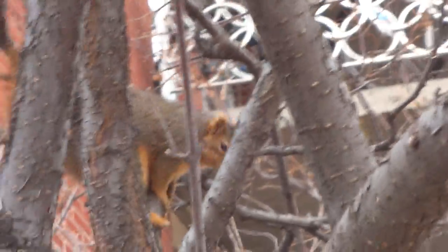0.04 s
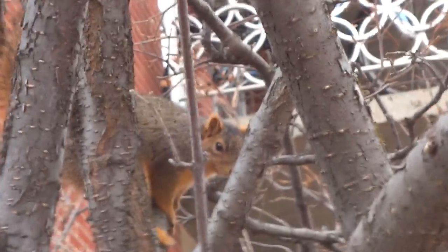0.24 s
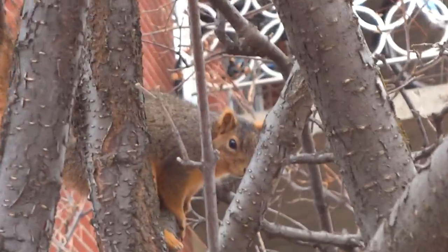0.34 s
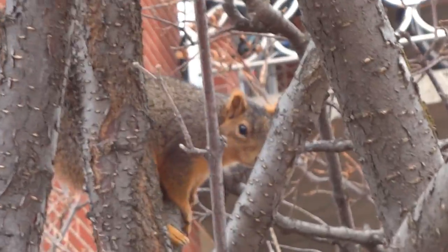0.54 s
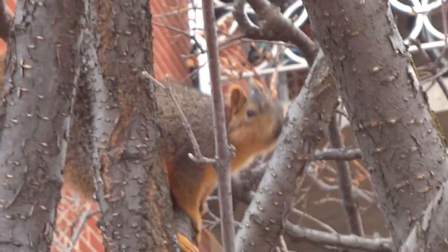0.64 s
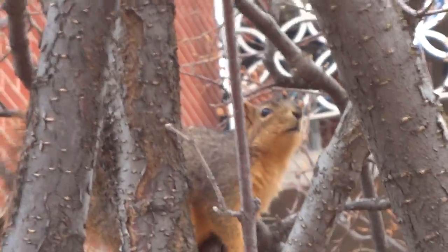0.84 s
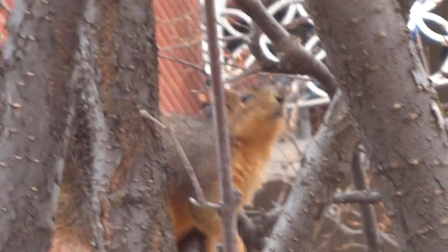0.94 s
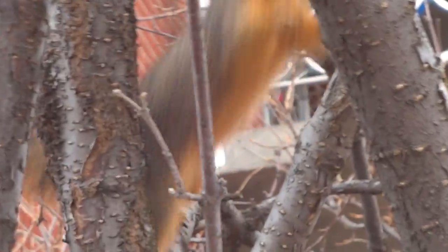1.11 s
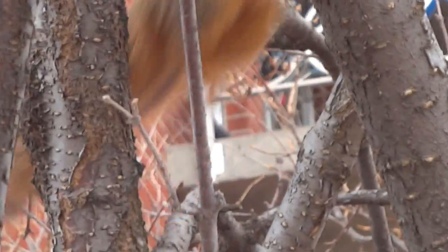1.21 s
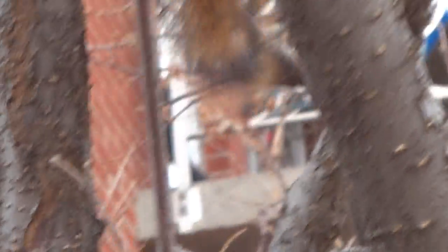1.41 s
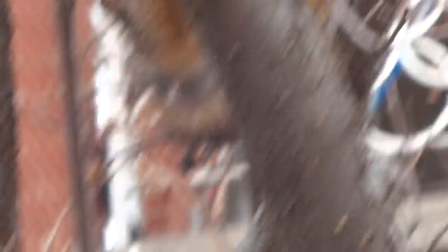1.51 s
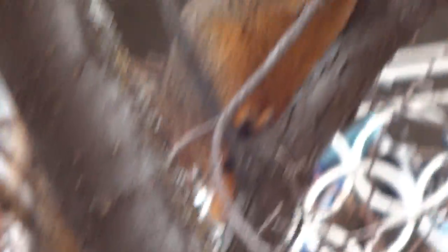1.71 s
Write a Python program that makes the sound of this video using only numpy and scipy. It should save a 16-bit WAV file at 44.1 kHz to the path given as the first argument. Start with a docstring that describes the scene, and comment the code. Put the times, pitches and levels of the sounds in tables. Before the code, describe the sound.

A small plastic catch snaps twice and rubs softly back, against a distant town hum.

```python
"""Quiet outdoor air and a far town hum run throughout. Close by, a little to the right, something small
and hard, probably a plastic button or catch, slides with a faint hiss and at 0.16 s snaps in a double
click that rings its shell. At 0.43 s it rubs back with a short scratchy creak. It slides and snaps
again at 0.78 s, and rubs back once more at about 1.44 s."""
import sys
import numpy as np
from scipy import signal
from scipy.fft import rfft, irfft
from scipy.io import wavfile
from scipy.ndimage import uniform_filter1d

SR = 44100
rng = np.random.default_rng(int(sys.argv[2]) if len(sys.argv) > 2 else 0)


def unload_wav(signal):
    """Save mono or channel-first audio to the path in sys.argv[1] as 16-bit WAV at rate SR, clipped to [-1, 1]."""
    wavfile.write(
        sys.argv[1],
        SR,
        np.round(np.clip(np.atleast_2d(signal).T, -1, 1) * 32767).astype(np.int16),
    )


N = 77175  # 1.75 seconds


def snaps():
    """The catch lets go, then lands an instant later: two dry cracks that leave the shell ringing."""
    # Each row: landing time in seconds, then in relative dB the landing's level, its boost,
    # the shell's highest tone, the first crack's level and its boost.
    double_clicks = [(0.1589, -1.5, -2, -15, -6.5, 5), (0.7825, -2, -0.5, -4, -16, 4)]
    # The tone of a crack. Each row: frequency in Hz, relative level in dB.
    tone = [(60, -22), (200, -12.5), (400, -8.5), (900, -3), (1200, -19), (1500, -3), (1850, -13),
            (2150, 4), (2550, 7), (3200, -1.5), (4200, -0.5), (5200, -2), (6800, -7.5), (9000, -14.5),
            (12000, -15.5), (16000, -37)]
    # Each row: frequency in Hz, left minus right in dB.
    balance = [(200, -1), (700, -1.5), (1400, -18), (2400, -5.5), (4200, -15.5), (6500, 5), (9000, 5),
               (15000, -5)]
    boost_share = read([(4800, 0.43), (7500, 0.58)])  # about half a boost applies, more in the treble
    gap_s, crack_db, release_ring_db = 0.00168, -4.5, -29
    out = np.zeros((2, N))
    for at, db, boost_db, top_db, release_db, release_boost_db in double_clicks:
        release, landing = -tap(at - gap_s, release_db), tap(at, db)  # they push opposite ways
        for push, extra_db in ((release, release_boost_db), (landing, boost_db)):
            out += undb(crack_db) * stereo(push, read(tone) + extra_db * boost_share, balance)
        ring = signal.fftconvolve(landing + undb(release_ring_db) * release, shell_ring(top_db))[:N]
        out += ring * undb([[-2], [2]])  # louder on the right
    return out


def shell_ring(top_db):
    """The struck shell rings with a few fading tones; top_db sets how strongly the highest one wakes."""
    # Each row: pitch in Hz, relative level in dB, seconds to fade by 60 dB.
    shell_tones = [(588.5, -44.5, 0.061), (1540, -76, 0.06), (2778, -38.5, 0.054), (3920, -42.5, 0.034),
                   (4460, -42.5, 0.067)]
    t = np.arange(N) / SR
    tones = [undb(db) * np.sin(2 * np.pi * hz * t) * undb(-60 * t / fade) for hz, db, fade in shell_tones]
    ring = sum(tones[:-1]) + undb(top_db) * tones[-1]
    low_cut = signal.butter(2, 418, "high", fs=SR, output="sos")  # the ring stays out of the low range
    return signal.sosfilt(low_cut, ring)


def slides():
    """Fine friction makes a hiss that grows until each snap; the first slide snags with bright ticks."""
    # Each row: peak time in seconds, rise in seconds, relative level in dB.
    hisses = [(0.152, 0.013, -42), (.779, 0.017, -47.5)]
    # Each row: time of a snag in seconds, relative level in dB.
    snags = [(0.1308, -32), (0.1472, -22)]
    # The tone of the hiss. Each row: frequency in Hz, relative level in dB.
    tone = [(590, -36), (1000, -10), (1940, -11), (2620, 6), (3380, 0), (4310, 6), (5970, -1.5),
            (8650, 2.5), (9600, -7), (11400, 6), (16000, -17)]
    # Each row: frequency in Hz, left minus right in dB.
    balance = [(1000, -11), (3000, -13.5), (6000, -1.5), (14000, 6)]
    loudness = sum(undb(db) * swell(at, rise, fall=0.0037) for at, rise, db in hisses)
    hiss = loudness * slips(per_second=14000, unevenness=0.2)
    ticks = sum(tap(at, db) for at, db in snags)
    return stereo(hiss + ticks, read(tone), balance)


def rubs():
    """The part catches and slips in quick spurts on its way back, and ticks as it lets go and stops."""
    # Each row: peak time, rise and fall in seconds, then relative level, body and treble boosts in dB.
    spurts = [(0.4251, 0.007, 0.00091, -45, -6, -2), (0.4272, 0.0015, 0.00069, -51, -2, 8),
              (.4320, 0.0021, 0.0007, -33.5, 15, 4), (1.4338, 0.0066, 0.0012, -45.5, -22, 3),
              (1.4373, 0.002, 0.001, -34.5, 10, -2), (1.4398, 0.0015, 0.0033, -35.5, -18, 2.5),
              (1.4517, .004, 0.00081, -44, -24, 4), (1.4563, 0.0018, 0.0048, -41.5, -17, -4)]
    # Each row: time of a dull tick in seconds, relative level in dB.
    dull_ticks = [(0.4147, -32), (1.4203, -26), (1.4581, -20)]
    # The tone of the creak. Each row: frequency in Hz, relative level in dB.
    tone = [(290, -53), (500, -37), (1090, -14), (1510, 4.5), (1840, -11.5), (1950, -10.5), (2810, 4.5),
            (3340, -0.5), (3700, -1.5), (4150, -11), (4730, -14.5), (7980, -14), (10700, -31.5),
            (13800, -28), (16000, -45)]
    # Each row: frequency in Hz, left minus right in dB.
    balance = [(60, -1.5), (110, -4), (200, -7), (380, -7), (700, -31), (1290, -10.5), (2380, -11),
               (4400, -5.5), (8120, -0.5), (15000, 2.5)]
    grit = slips(per_second=4300, unevenness=0.13)
    body = read([(1700, 0.56), (2200, 0.44)])  # about half applies, more in the hollow low range
    treble = read([(4000, 0), (8000, 1)])
    creak = np.zeros((2, N))
    for at, rise, fall, db, body_db, treble_db in spurts:
        spurt = undb(db) * swell(at, rise, fall) * grit
        creak += stereo(spurt, read(tone) + body_db * body + treble_db * treble, balance)
    ticks = sum(tap(at, db) for at, db in dull_ticks)
    dull_tone = read(tone) - 8 * body - 10 * treble
    return creak + stereo(ticks, dull_tone, balance)


def echo(near, level_db=-22, fade_s=0.35):
    """Tree trunks and walls scatter the close sounds back as a faint, short tail."""
    t = np.arange(N) / SR
    tail = rng.standard_normal((2, N)) * undb(-60 * t / fade_s)
    tail /= np.sqrt(np.sum(tail ** 2, axis=1, keepdims=True))
    return undb(level_db) * signal.fftconvolve(near, tail, axes=1)[:, :N]


def outdoor_air(level_db=-59, waver_db=1.11):
    """Far traffic blends into a soft wash, wide in the middle pitches, with thin hiss on top."""
    # The tone of the wash. Each row: frequency in Hz, relative level in dB.
    tone = [(20, -29), (55, -13), (90, -11), (120, -4), (180, -3), (245, -4), (290, -9), (500, -6),
            (750, -4), (1000, -7), (1300, -11), (1600, -13), (2200, -19), (3500, -23), (7000, -26),
            (15000, -28)]
    # Each row: frequency in Hz, left minus right in dB.
    balance = [(60, 0.16), (110, 1), (200, 0.97), (380, -2.3), (700, -0.099), (1290, -2.1), (2380, 1),
               (4400, 0.13), (8120, -0.17), (15000, -0.15)]
    # Each row: frequency in Hz, how alike left and right are (1 the same, 0 unrelated, below 0 opposed).
    likeness = [(60, 0.75), (130, 1), (290, 0.67), (640, 0.39), (1410, -0.024), (3100, -0.17), (6820, 0.56),
                (15000, 0.99)]
    alike = np.clip(read(likeness), -0.95, 0.99)
    width_db = 10 * np.log10((1 - alike) / (1 + alike))
    middle = colour(rng.standard_normal(N), read(tone))
    width = colour(rng.standard_normal(N), read(tone) + width_db)
    pair = np.array([colour(middle + side * width, side * read(balance) / 2) for side in (1, -1)])
    return pair / np.std(middle) * undb(level_db + waver_db * wander(6.54))


def machine_hum(waver_db=1, drift_radians=0.27):
    """Distant machines give off low, wavering tones."""
    # Each row: pitch in Hz, average level in dB.
    tones = [(119, -74), (147, -77.5), (226, -74.5)]
    t = np.arange(N) / SR
    out = np.zeros(N)
    for hz, db in tones:
        loudness = np.sqrt(2) * undb(db + waver_db * wander(6.4))
        out += loudness * np.sin(2 * np.pi * hz * t + drift_radians * wander(10.6))
    return out


def tap(at, db):
    """One instant push, a single sample long."""
    return (np.arange(N) == int(at * SR)) * undb(db)


def slips(per_second, unevenness):
    """Friction as a crowd of tiny slips at random moments, uneven in size."""
    pushes = (rng.random(N) < per_second / SR) * rng.choice([-1, 1], N)
    return unit(pushes * np.exp(unevenness * rng.standard_normal(N)))


def swell(at, rise, fall):
    """A curve that grows to a peak and then dies away; all times are in seconds."""
    t = np.arange(N) / SR - at
    return np.exp(np.where(t < 0, t / rise, -t / fall))


def wander(per_second):
    """A smooth random wobble, about 1 in size."""
    hold = int(SR / per_second)
    steps = np.repeat(rng.standard_normal(N // hold + 1), hold)
    return unit(uniform_filter1d(uniform_filter1d(steps, hold), hold)[:N])


def stereo(x, db, balance):
    """Shape a sound's tone without changing the power of plain noise, then tilt it left or right."""
    db = db - 10 * np.log10(np.mean(undb(db) ** 2))
    return np.array([colour(x, db + side * read(balance) / 2) for side in (1, -1)])


def colour(x, db):
    """Turn each frequency up or down by the given dB."""
    cepstrum = irfft(np.log(undb(db)), N)
    cepstrum[1:] *= 2
    cepstrum[N // 2:] = 0  # so ringing follows a push and never comes before it
    return irfft(rfft(x) * np.exp(rfft(cepstrum)), N)


def read(points):
    """Join rows of frequency in Hz and value into a curve over all frequencies."""
    hz, value = np.array(points, float).T
    all_hz = np.maximum(np.fft.rfftfreq(N, 1 / SR), 1)
    return np.interp(np.log(all_hz), np.log(hz), value)


def undb(db):
    """Turn decibels into a number to multiply by."""
    return 10 ** (np.asarray(db) / 20)


def unit(x):
    """Scale a signal to an average power of 1."""
    return x / np.sqrt(np.mean(x ** 2))


def scene():
    """The close catch and its echo over the outdoor background."""
    presses, creaks = snaps() + slides(), rubs()
    scatter = echo(presses + undb(5) * creaks)  # the creaks spread more widely than the snaps
    return presses + creaks + scatter + outdoor_air() + machine_hum()


def record(dry):
    """Cut away the very highest treble, above 15900 Hz."""
    return signal.sosfilt(signal.ellip(10, 0.1, 70, 15900, fs=SR, output="sos"), dry)


dry = scene()
out = record(dry)
unload_wav(out)
```